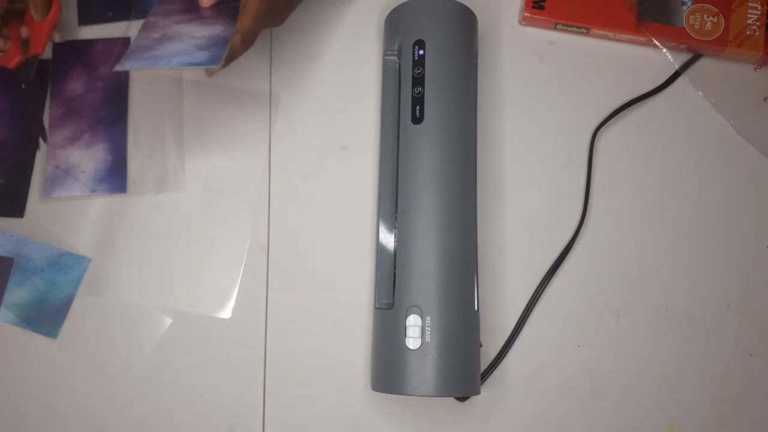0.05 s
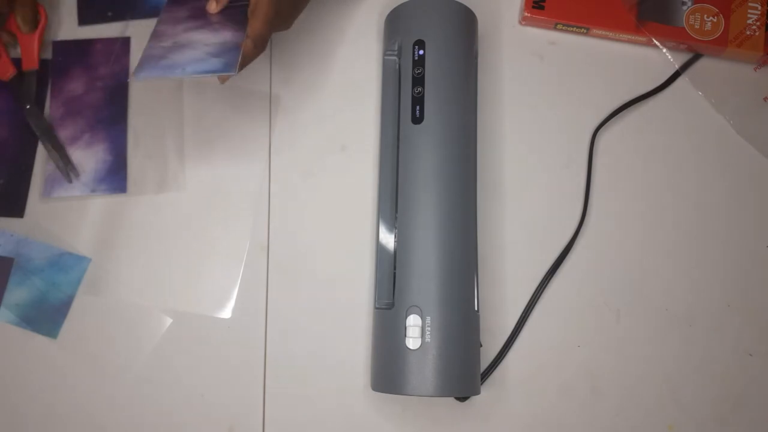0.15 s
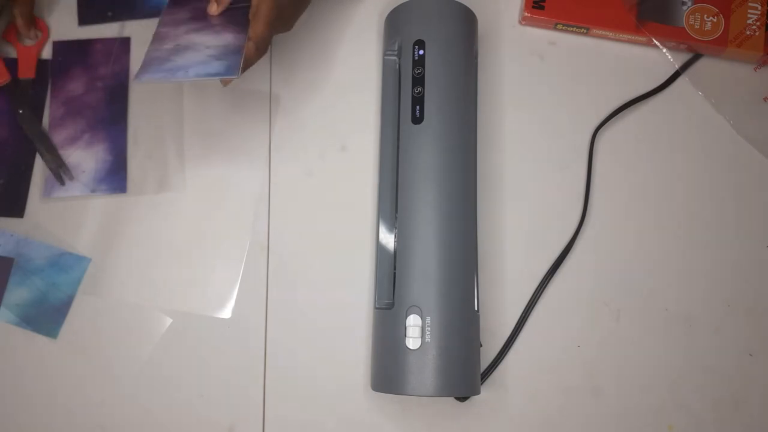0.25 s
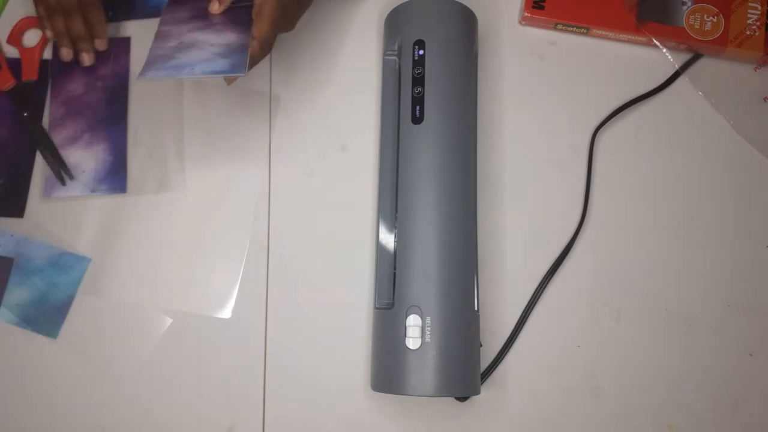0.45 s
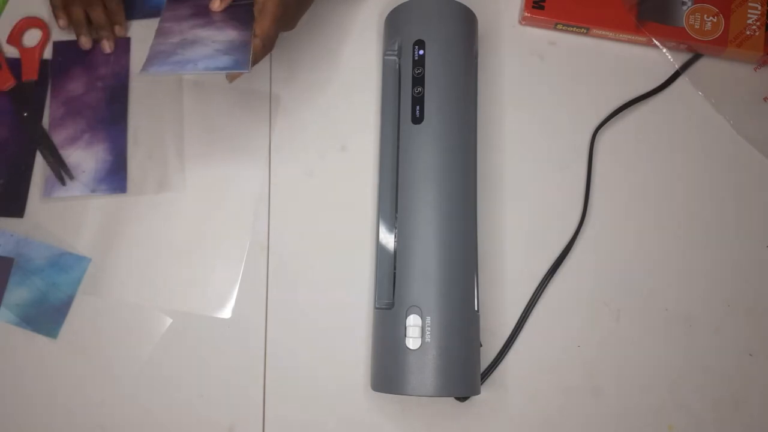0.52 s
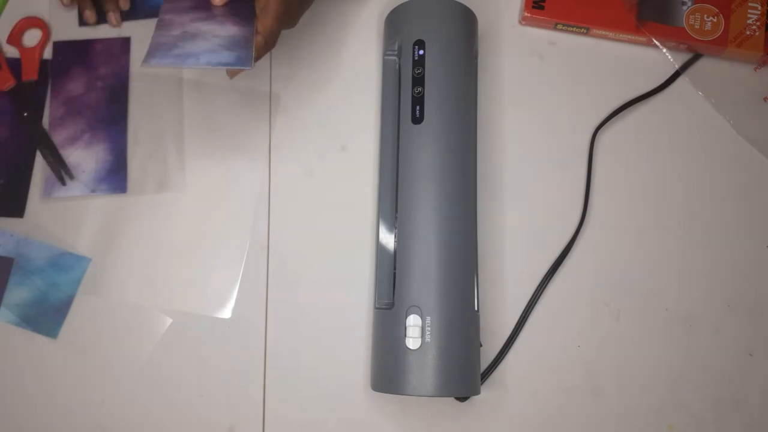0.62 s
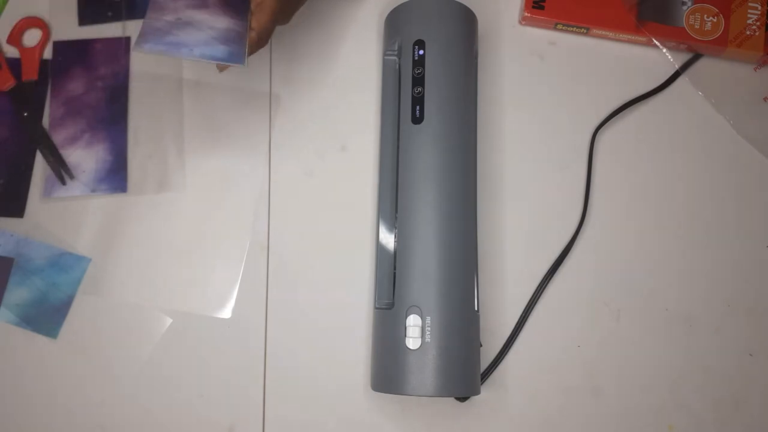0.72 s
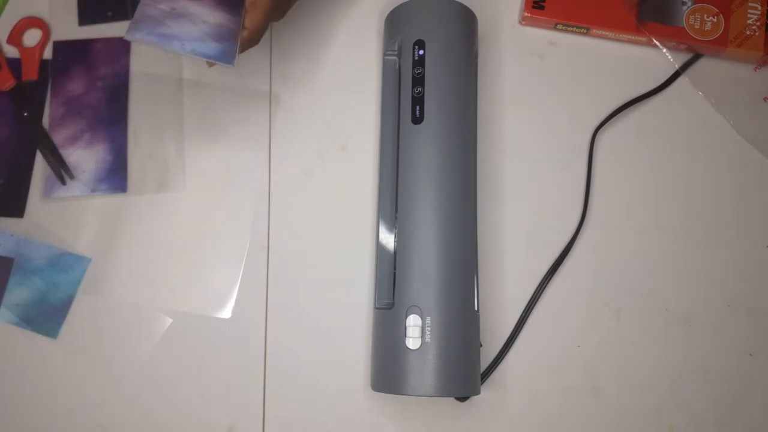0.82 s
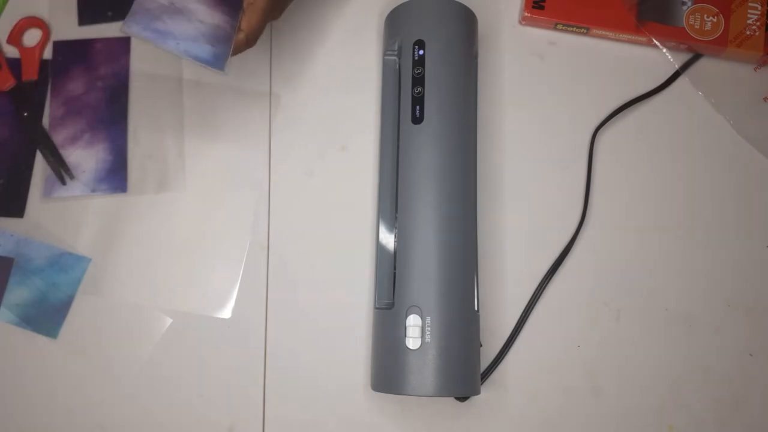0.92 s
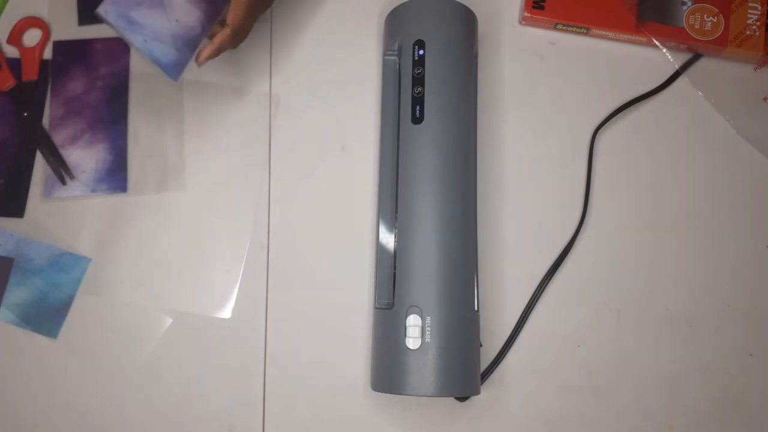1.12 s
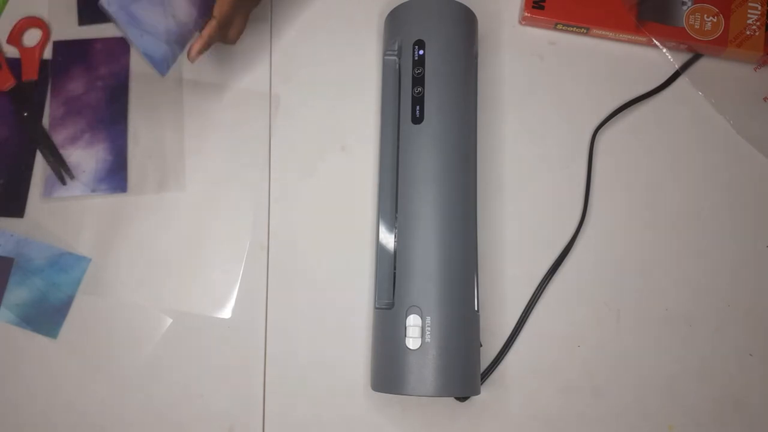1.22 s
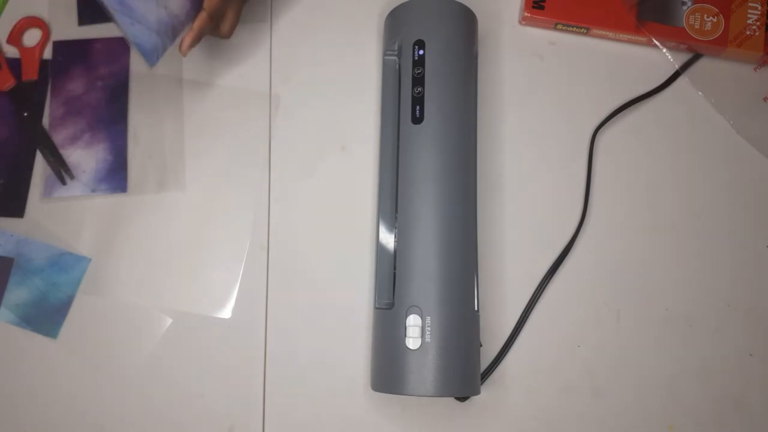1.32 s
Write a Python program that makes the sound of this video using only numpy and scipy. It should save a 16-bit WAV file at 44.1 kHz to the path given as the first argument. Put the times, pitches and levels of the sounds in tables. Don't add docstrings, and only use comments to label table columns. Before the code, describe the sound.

Laminated card flexed by hand ticks, pings and snaps sharply over a low machine hum

```python
import sys
import numpy as np
from scipy import signal
from scipy.fft import rfft, irfft
from scipy.io import wavfile
from scipy.ndimage import uniform_filter1d

SR = 44100
rng = np.random.default_rng(int(sys.argv[2]) if len(sys.argv) > 2 else 0)


def voltage_ratio(decibels):
    exponent = np.asarray(decibels, float) / 20
    return 10 ** exponent


def generate_wav(signal):
    frames = np.transpose(np.atleast_2d(signal))
    scaled = np.clip(frames, -1, 1) * 32767
    pcm = np.round(scaled).astype(np.int16)
    wavfile.write(sys.argv[1], SR, pcm)


N = 59535


def evened(x):
    return x / np.sqrt(np.mean(x ** 2) + 1e-20)


def read(points, hz):
    f, value = np.transpose(points)
    return np.interp(np.log(hz + 1), np.log(f + 1), value)


def over_time(points):
    return voltage_ratio(np.interp(np.arange(N) / SR, *np.transpose(points)))


def add(mix, start_s, sound):
    part = mix[:, round(start_s * SR):][:, :sound.shape[1]]
    part += sound[:, :part.shape[1]]


def diffuse_pair(size, gain):
    # pitch_hz, likeness (0 to 1)
    likeness = [(100, 0.96), (300, 0.92), (600, 0.68), (1200, 0.046), (2500, 0.058), (10000, 0.095)]
    hz = np.fft.rfftfreq(size, 1 / SR)
    a, b = rfft(rng.standard_normal((2, size)), axis=1)
    same = np.clip(read(likeness, hz), 0, 1)
    right = same * a + np.sqrt(1 - same ** 2) * b
    return irfft(np.array([a, right]) * gain(hz), size, axis=1)


def tail(colour=((1, 0), (2, 0)), rise_s=0.0016, grip_s=1):
    # pitch_hz, t60_s (time to fall 60 dB)
    room = [(80, 0.48), (250, 0.34), (1000, 0.41), (3000, 0.31), (8000, 0.24), (15000, 0.31)]
    grip_hz, grip_db_per_s = 1300, 242
    size = SR // 2
    noise = diffuse_pair(size, lambda f: voltage_ratio(read(colour, f)))
    hz, t, z = signal.stft(noise, SR, nperseg=512)
    hz = hz[:, None]
    stilled_db = grip_db_per_s * np.clip(t - grip_s, 0, .04) / (1 + (hz / grip_hz) ** 2)
    fading = voltage_ratio(-60 * t / read(room, hz) - stilled_db)
    out = signal.istft(z * fading, SR, nperseg=512)[1][:, :size]
    out = out * np.minimum(np.arange(size) / SR / rise_s, 1) ** 2
    return out * np.sqrt(2) / np.linalg.norm(out)


def near(x, start_s=1):
    # delay_s, level_db
    echoes = [(.0007, -11), (.0033, -15), (.0075, -14), (.0095, -16), (.0118, -17), (.0155, -17)]
    moved_s = .8
    left_lag_s = .00016 if start_s < moved_s else .00004
    left_db = -1
    taps = np.zeros((2, 1000))
    for delay_s, db in echoes:
        place = round(delay_s * SR) + rng.integers(0, 9, 2)
        taps[[0, 1], place] = voltage_ratio(db) * rng.choice([-1, 1])
    taps[[0, 1], [round(left_lag_s * SR), 0]] = voltage_ratio(left_db), 1
    return signal.fftconvolve(x[None], taps, axes=1)


def heard(x, room_db):
    out = signal.fftconvolve(x[None], voltage_ratio(room_db) * tail(), axes=1)
    add(out, 0, near(x))
    return out


def ring(modes, push_s):
    rise_cycles = .3
    t = np.arange(0, .12, 1 / SR)
    sound = np.zeros(len(t))
    for k, (hz, db, t60_s) in enumerate(modes):
        swell = (1 - np.exp(-t / (push_s + rise_cycles / hz))) ** 2
        fading = voltage_ratio(db - 60 * t / t60_s)
        sound += (-1) ** k * fading * swell * np.sin(2 * np.pi * hz * t)
    return sound / abs(sound).max()


def hum():
    # pitch_hz, level_db (per Hz)
    rumble = [(21, -56), (35, -8.5), (124, -7.5), (309, -13), (346, -13), (728, -18), (770, -20),
              (830, -19), (3000, -53), (3900, -94), (6600, -120)]
    # pitch_hz, width_hz, level_db
    peaks = [(61.2, 16, -3.5), (128.3, 39.6, -1), (154.7, 17, -2), (201.1, 11.8, -0.5), (331, 60, -14.5),
             (419.4, 44, -12.5), (1730, 490, -29.5)]
    # pitch_hz, level_db (per Hz)
    hiss_tone = [(1180, -38), (2000, -11), (3550, -11), (4530, -14), (4900, -16.5), (8630, -12),
                 (16000, -15)]
    # time_s, level_db
    load = [(0, -1.5), (.1, -1.5), (.24, 0.5), (.45, 0.5), (.7, -2), (.86, -1.5), (1.05, -1), (1.35, -3)]

    def resonances(f):
        power = 0
        for hz, width_hz, db in peaks:
            power = power + voltage_ratio(2 * db) / (1 + (2 * (f - hz) / width_hz) ** 2) ** 2
        return np.sqrt(power)

    wide = voltage_ratio(-41.5) * evened(diffuse_pair(N, lambda f: voltage_ratio(read(rumble, f))))
    narrow = voltage_ratio(-39.5) * evened(diffuse_pair(N, resonances))
    hiss = voltage_ratio(-65) * evened(diffuse_pair(N, lambda f: voltage_ratio(read(hiss_tone, f))))
    return hiss + over_time(load) * (wide + narrow)


def earlier_crackle():
    # pitch_hz, level_db (per Hz)
    crackle = [(590, -58), (1000, -16.5), (1190, -31.5), (1300, -9), (1940, 1), (2230, -5), (15500, -30.5)]
    out = np.zeros((2, N))
    add(out, 0, voltage_ratio(-15.5) * tail(crackle)[:, 800:])
    return out


def rub():
    # time_s, level_db
    stroke = [(0, -52), (0.082, -105), (.82, -111), (.87, -73), (.91, -52.5), (0.948, -44), (0.975, -51),
              (0.997, -37), (1.017, -44), (1.035, -61), (1.1, -56.5), (1.126, -45), (1.16, -69),
              (1.2, -62.5), (1.35, -75)]
    # pitch_hz, level_db (per Hz)
    rub_tone = [(590, -58), (1000, -66), (1480, -8.5), (1910, -12), (2710, -14), (3890, -15), (4620, -21.5),
                (9490, -12.5), (16000, -22.5)]
    grains_per_s, spread_db, room_db = 3500, 3.5, 1
    sizes = rng.choice([-1., 1.], N) * voltage_ratio(spread_db * rng.exponential(1, N))
    slips = sizes * (rng.random(N) < grains_per_s / SR)
    colour = voltage_ratio(read(rub_tone, np.fft.rfftfreq(N, 1 / SR)))
    slips = evened(irfft(rfft(slips) * colour, N))
    return heard(slips * over_time(stroke), room_db)[:, :N]


def creaks():
    # start_s, level_db (peak), pitch_hz, overtone_hz, overtone_db
    releases = [(.158, -44, 1600, 3400, -15), (.893, -50, 1600, 3400, -8), (.9023, -47, 2000, 4000, -8),
                (.9282, -40, 1880, 4000, -5), (.9335, -44, 1800, 6200, -2), (.9397, -36, 1950, 4100, -8),
                (.9425, -35, 2350, 4300, -8), (.948, -37, 2500, 4600, -6), (.9555, -39, 2300, 3400, -3),
                (.9597, -32, 1980, 3900, 0), (.9628, -35, 2050, 5000, -10), (.969, -38, 1850, 3800, -8),
                (.976, -40, 1900, 3500, -8), (.9875, -35, 2100, 4200, -8), (.9916, -33, 1860, 6500, -8),
                (.994, -35, 1800, 3000, -2), (.9985, -34, 1800, 3300, -6), (1.0005, -32, 1850, 4000, -10),
                (1.0080, -27, 1950, 3600, -12), (1.0125, -35, 1800, 2600, -4),
                (1.0157, -30.5, 1980, 4200, -2), (1.0225, -37, 1800, 3200, -6),
                (1.0268, -33, 1950, 3700, -12), (1.037, -41, 1800, 3600, -8), (1.045, -38, 1800, 3800, -12),
                (1.050, -39, 1700, 3000, -10), (1.235, -35, 1750, 3500, -10), (1.2455, -46, 2000, 3600, -3)]
    # pitch_hz, level_db (per Hz)
    creak_out = [(1100, -15.5), (1500, -11.5), (1850, 2), (2400, -24.5), (4200, -10), (6000, -21),
                 (12000, -56)]
    t60_s, push_s, louder_db, room_db = .011, .0004, 1, -6
    out = np.zeros((2, N))
    for start_s, db, hz, overtone_hz, overtone_db in releases:
        modes = [(hz, 0, t60_s), (overtone_hz, overtone_db, t60_s * 0.84)]
        click = voltage_ratio(db + louder_db) * ring(modes, push_s)
        add(out, start_s, near(click))
        add(out, start_s, voltage_ratio(room_db) * np.linalg.norm(click) * tail(creak_out))
    return out


def buckles():
    # pitch_hz, level_db, t60_s
    tick = [(860, -14, 0.016), (1600, -7, 0.027), (2390, -8, 0.024), (3220, -0.5, .005),
            (4550, -2.5, 0.0062), (5550, 3, 0.0036), (7340, -1.5, 0.0022), (10780, -6.5, .004),
            (12300, -28.5, 0.0028)]
    ping = [(4600, -21, .006), (9800, 1, .0025), (11300, 0, .0025), (12800, -1, .0025), (14500, -3, .0025)]
    snap = [(290, -3, .02), (450, 0, .016), (620, -6, .02), (850, -7, .014), (1240, -9, .014),
            (1670, -3, .012), (2370, -8, .009), (3650, 2, .013), (4660, -7, .006), (5700, -6, .006),
            (6900, -7, .005), (9000, -9, .004), (12000, -14, .004)]
    flap = [(75, -22, .1), (126, -14, .08), (198, -13, .05), (275, 0, .017), (424, -11, .04),
            (620, -9, .02), (1100, -18, .015)]
    slip = [(1100, -5, .008), (1800, -3, .008), (2600, -7, .005), (3400, -3, .005), (4500, 1, .008),
            (6300, -2, .005), (7400, -2, .005), (8200, -1, .005), (10500, -4, .004), (12500, -6, .003),
            (14500, -8, .003)]
    pat = [(1950, 0, .012), (3400, -4, .004), (4500, -3, .005), (5900, -5, .004), (6900, -4, .004),
           (7900, -2, .004), (9500, -6, .003), (11500, -7, .003), (14000, -7, .003)]
    # pitch_hz, level_db (per Hz)
    tick_out = [(130, -5.5), (500, -12), (1200, -18.5), (1730, -10), (2740, -12), (5200, -10),
                (6730, -19.5), (15500, -23.5)]
    ping_out = [(3820, -19.5), (6500, -5), (7090, -32), (7660, -5), (12100, -3), (15500, -5.5)]
    snap_out = [(120, -24), (290, 6.5), (620, -1.5), (1020, -9), (1280, 1.5), (2660, -11.5), (3680, -5),
                (11800, -18.5), (15500, -31.5)]
    flap_out = [(35, -24), (60, 0.5), (125, -4), (361, -1.5), (542, -11.5), (674, -15.5), (1860, -22),
                (2500, -38), (3250, -83), (5500, -120)]
    slip_out = [(710, -6), (1200, -3.5), (2800, -7), (4570, -3), (5550, -8), (7090, -2), (15500, -14.5)]
    pat_out = [(820, -41), (1400, -7), (1930, 7), (2530, -13), (4150, -4.5), (4500, -8.5), (15500, -16)]
    starts = [
        .1978,
        .2410,
        .3098,
        .3488,
        1.1350,
        1.2853,
    ]
    levels = [-18, -6, 2.5, -1.5, -24, -28]
    pushes = [.0002, .00015, .0002, .0002, .0002, .00015]
    rooms = [4, -4.5, 1.5, -0.5, 6, 3.5]
    rises = [.007, .005, .005, .025, .006, .006]
    grip_at_s = 0.394
    bodies = [tick, ping, snap, flap, slip, pat]
    colours = [tick_out, ping_out, snap_out, flap_out, slip_out, pat_out]
    out = np.zeros((2, N))
    events = zip(starts, levels, pushes, rooms, rises, bodies, colours)
    for start_s, db, push_s, room_db, rise_s, modes, colour in events:
        click = voltage_ratio(db) * ring(modes, push_s)
        add(out, start_s, near(click, start_s))
        grip_s = grip_at_s - start_s if start_s < grip_at_s else 1
        answer = tail(colour, rise_s, grip_s)
        add(out, start_s, voltage_ratio(room_db) * np.linalg.norm(click) * answer)
    return out


def scene():
    return hum() + earlier_crackle() + rub() + creaks() + buckles()


def band_limit(x):
    return signal.sosfilt(signal.butter(12, 16400, fs=SR, output="sos"), x)


def record(dry):
    knee_db, squeeze, recover_db_per_s = -26, .22, 40
    low_cut_hz, high_cut_hz = 38, 15800
    power_db = 10 * np.log10(abs(uniform_filter1d((dry ** 2).mean(0), 200)) + 1e-12)
    fall_db = np.arange(N) * recover_db_per_s / SR
    held_db = np.maximum.accumulate(power_db + fall_db) - fall_db
    over_db = np.maximum(held_db - knee_db, 0)
    ducked = dry / voltage_ratio(squeeze * uniform_filter1d(over_db, 100))
    ducked = signal.sosfilt(signal.butter(2, low_cut_hz, "high", fs=SR, output="sos"), ducked)
    low_pass = signal.firwin(255, high_cut_hz, window=("kaiser", 8), fs=SR)
    mix = signal.oaconvolve(ducked, low_pass[None], "same")
    return band_limit(np.clip(mix, -1, 1))


dry = scene()
out = record(dry)
generate_wav(out)
```